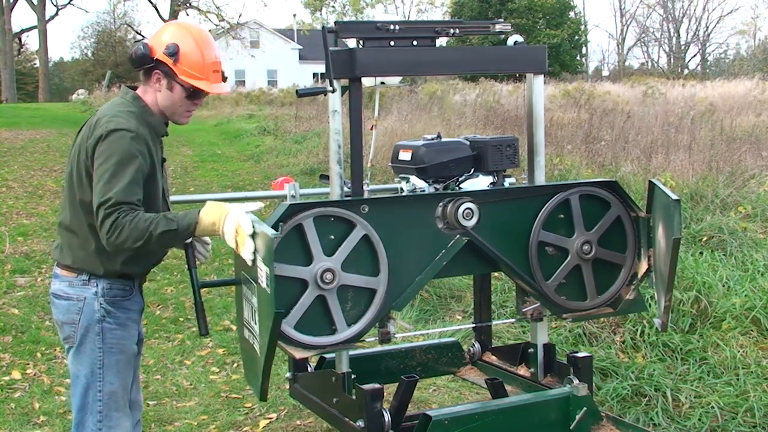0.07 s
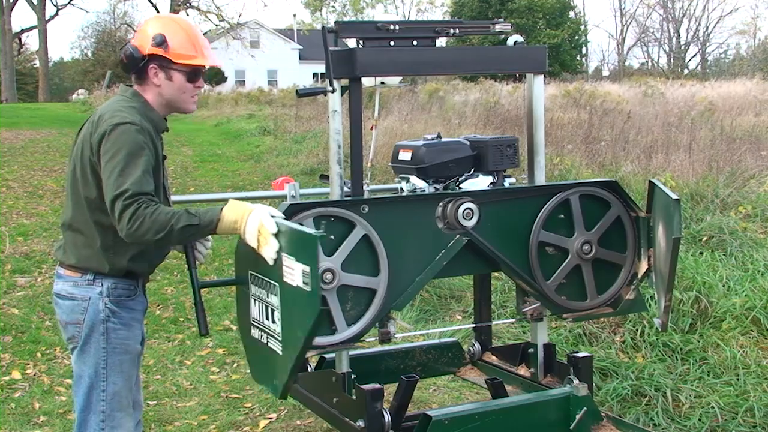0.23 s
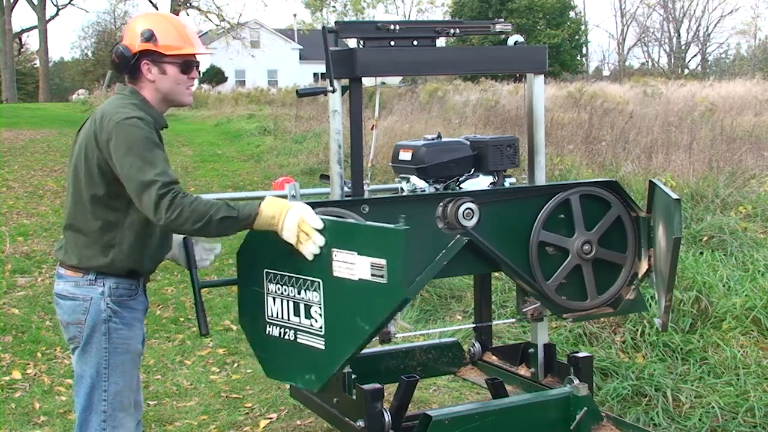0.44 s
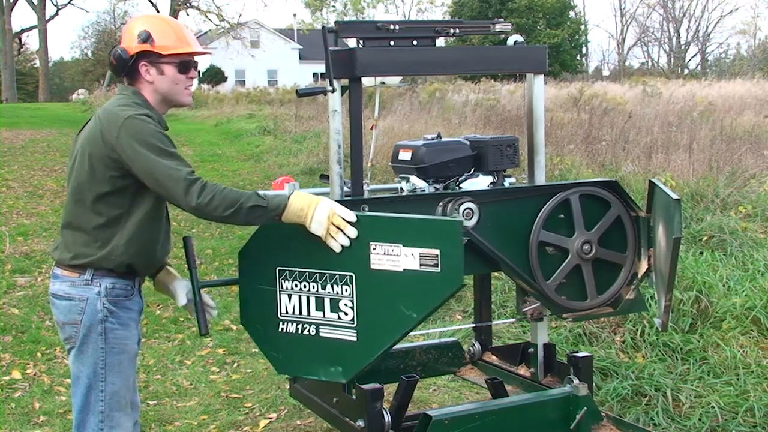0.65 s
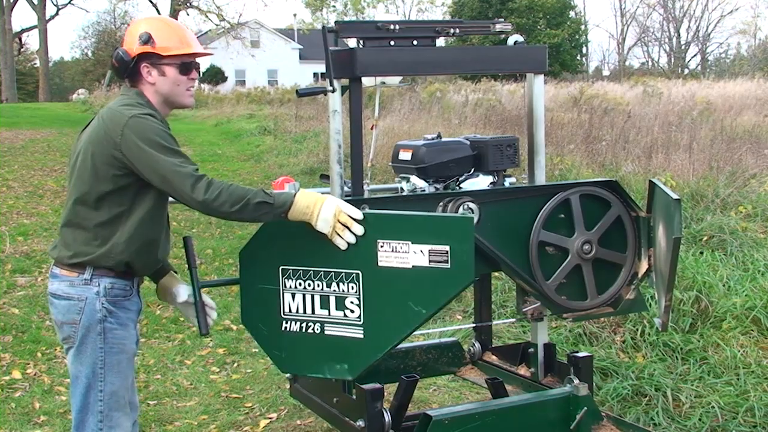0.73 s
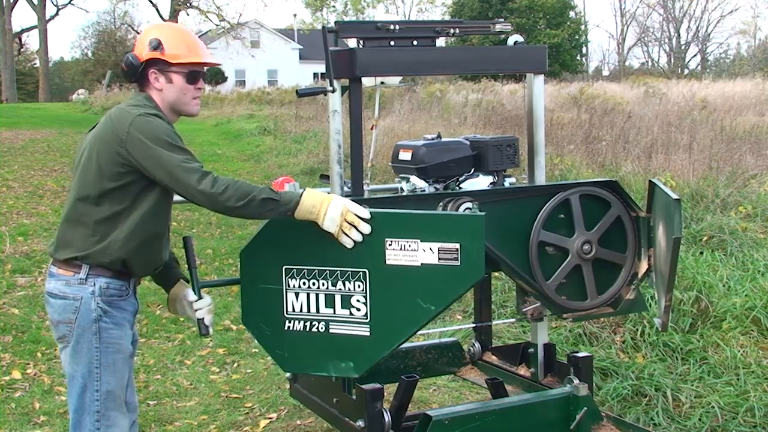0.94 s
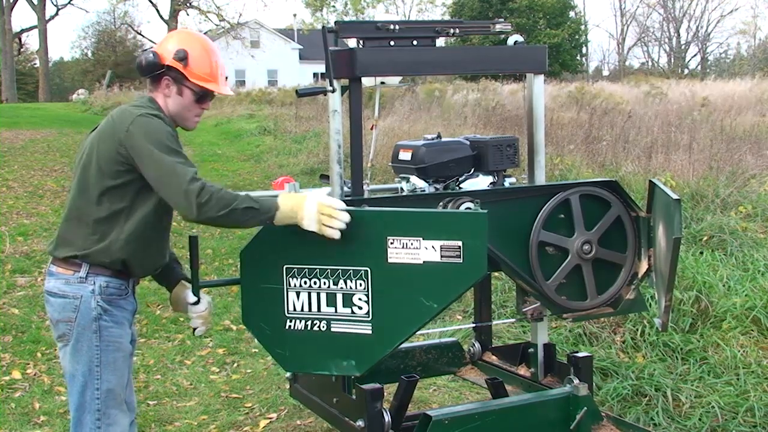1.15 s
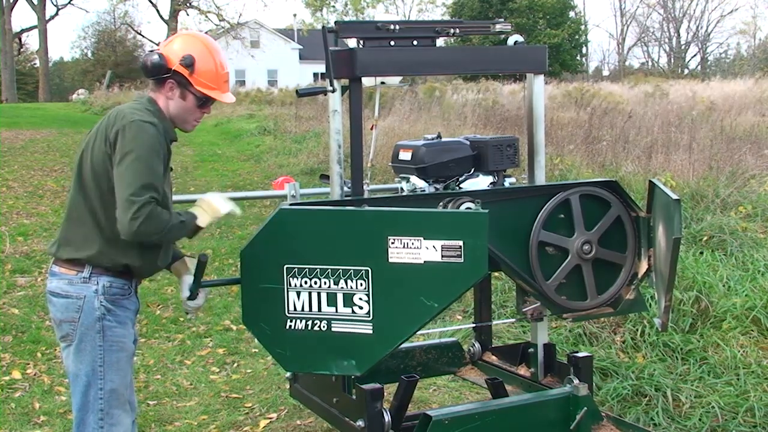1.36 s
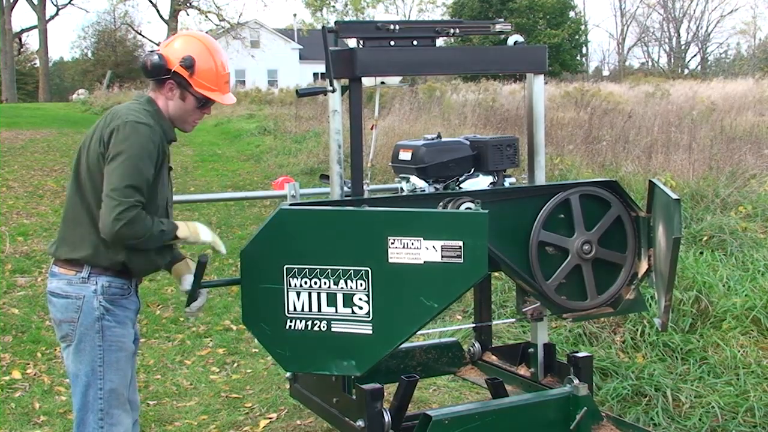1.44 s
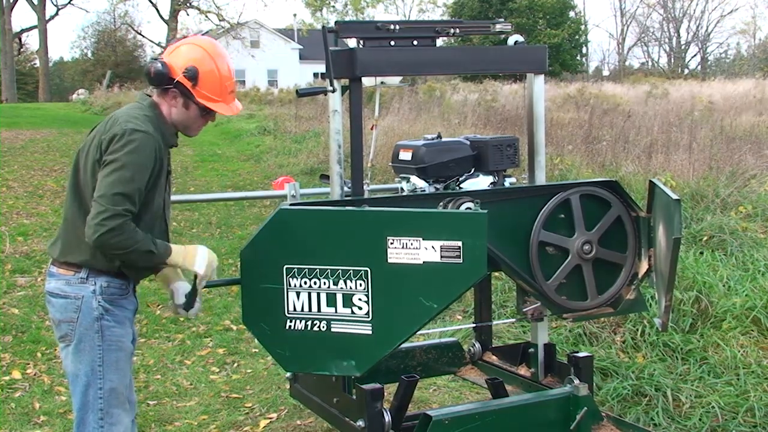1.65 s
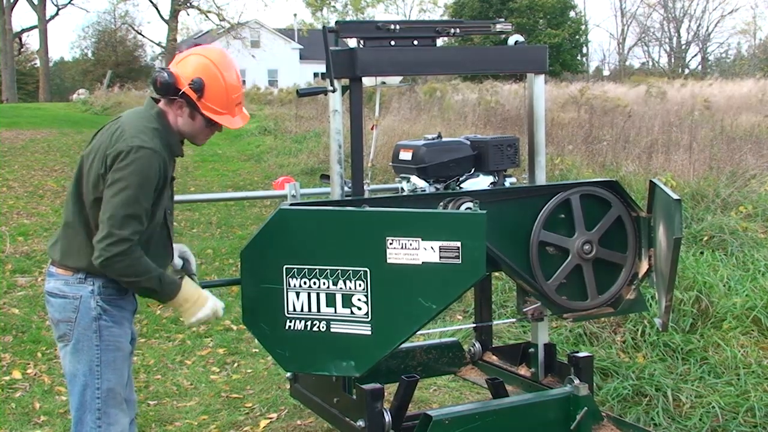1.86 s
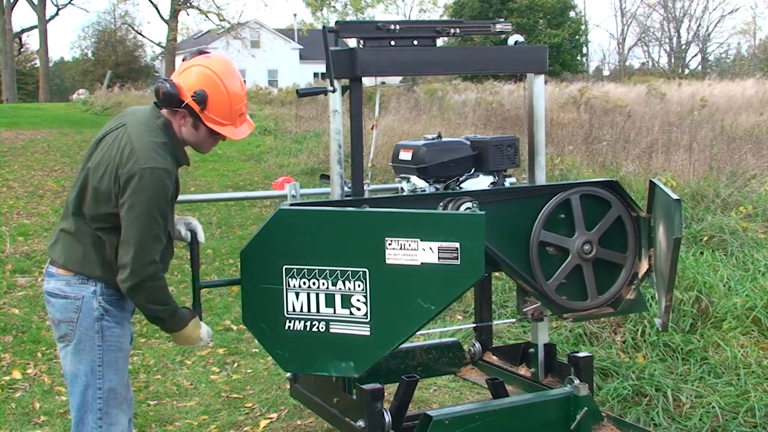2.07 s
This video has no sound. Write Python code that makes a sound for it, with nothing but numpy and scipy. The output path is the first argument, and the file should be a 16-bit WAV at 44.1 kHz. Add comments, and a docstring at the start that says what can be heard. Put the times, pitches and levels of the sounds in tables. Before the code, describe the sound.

A sheet-steel guard door swings shut on a sawmill with one bright clang and a brief ring. A glove slips off it with a short groan, then a sleeve rustles nearby and a handle ticks faintly, over quiet outdoor hiss.

```python
"""Low outdoor rumble and steady hiss, with faint rustle and handle ticks. A sheet-steel guard door is
swung shut on a sawmill: its edge clashes on the frame and the panel rings briefly in many modes.
A faint far whistle passes. A gloved hand sticks and slips off the door with a short groan,
then a sleeve rustles close by and the handle ticks again."""
import sys
import numpy as np
from scipy import signal
from scipy.fft import rfft, irfft
from scipy.io import wavfile

SR = 44100
rng = np.random.default_rng(int(sys.argv[2]) if len(sys.argv) > 2 else 0)


def pcm_store(signal):
    """Save signal as 16-bit PCM."""
    levels = np.round(np.clip(np.atleast_2d(signal), -1, 1) * 32767)
    wavfile.write(sys.argv[1], SR, levels.astype(np.int16).T)


N = 92610
T = np.arange(N) / SR
SLAM_S = 0.2296


def undb(db):
    """Decibels to gain."""
    return 10 ** (np.asarray(db) / 20)


def at_hz(hz, points):
    """Interpolate (f/Hz, value) points over log frequency."""
    f, value = np.array(points, float).T
    return np.interp(np.log(np.maximum(hz, 1)), np.log(f), value)


def shaped(gain):
    """Unit-rms noise with amplitude spectrum gain(f)."""
    f = np.arange(N // 2 + 1) * SR / N
    noise = irfft(rfft(rng.standard_normal(N)) * gain(f), N)
    return noise / noise.std()


def coloured(points):
    """Unit-rms noise from (f/Hz, relative density/dB) points."""
    return shaped(lambda f: undb(at_hz(f, points)))


def band(hz, width_hz):
    """Unit-rms noise in one resonance; width at -6 dB."""
    return shaped(lambda f: 1 / (1 + ((f * f - hz * hz) / (np.maximum(f, 1) * width_hz)) ** 2))


def walk(corner_hz):
    """Smooth random drift, mean 0, spread 1."""
    drift = shaped(lambda f: 1 / (1 + (f / corner_hz) ** 2) ** 2)
    return drift - drift.mean()


def decay(start_s, t60_s, rise_s=0.00017):
    """Quick rise, exponential fall."""
    age = np.maximum(T - start_s, 0)
    return (1 - np.exp(-age / rise_s)) * np.exp(-np.log(1000) * age / t60_s)


def swell(middle_s, half_s):
    """Gaussian envelope; half-width at 1/e."""
    return np.exp(-((T - middle_s) / half_s) ** 2)


def ring(start_s, modes):
    """Damped sines (f/Hz, level/dB, t60/s) struck together, signs random."""
    out, first = np.zeros(N), int(start_s * SR)
    for (hz, db, t60), sign in zip(modes, rng.choice([-1, 1], len(modes))):
        age = T[:min(N - first, int(t60 * SR))]
        envelope = undb(db) * np.exp(-np.log(1000) * age / t60)
        out[first:first + len(age)] += sign * envelope * np.sin(2 * np.pi * hz * age)
    return out


def air(mid_db=-53.5, side_db=-72, rumble_below_hz=85, waver_db=2):
    """Steady hiss over a wavering rumble, almost the same left and right."""
    # background common to both sides: f/Hz, relative density/dB
    mid_spectrum = [(15, -74), (25, -12.5), (65, -0.5), (169, -11.5), (197, -16), (269, -14), (377, -21.5),
                    (718, -15), (1090, -18), (1520, -20.5), (1640, -20), (1770, -25), (4610, -31.5),
                    (11100, -31.5), (12000, -35), (15600, -66), (22000, -120)]
    # background in antiphase: f/Hz, relative density/dB
    side_spectrum = [(25, 7.5), (70, -5.5), (250, -15), (1000, -35), (3000, -38.5), (6000, -18.5),
                     (10000, -19), (12000, -18), (13000, -60)]
    mid = coloured(mid_spectrum)
    rumble = signal.sosfiltfilt(signal.butter(2, rumble_below_hz, fs=SR, output="sos"), mid)
    mid = mid - rumble + rumble * undb(waver_db * walk(3.3))
    side = coloured(side_spectrum) * np.array([[1], [-1]])
    return undb(mid_db) * mid + undb(side_db) * side


def clothes(grain_db=1.2, grain_hz=250):
    """Grainy rub of a sleeve, dull shuffles of cloth and feet, soft body bumps."""
    # sleeve rub: t/s, level/dB
    sleeve_level = [(0, -58.5), (.09, -59.5), (.2, -61), (.7, -70), (1.25, -63.5), (1.39, -54.5),
                    (1.44, -46), (1.48, -51.5), (1.51, -47), (1.575, -57.5), (1.62, -52.5), (1.69, -68),
                    (1.88, -58.5), (2.0, -63), (2.1, -57)]
    # sleeve colour: f/Hz, relative density/dB
    sleeve_spectrum = [(200, -3.5), (500, -2), (900, -13), (1400, -2.5), (1900, -10.5), (2700, -12),
                       (4200, -13), (6000, -20), (9000, -15.5), (12000, -20.5)]
    # shuffles: middle t/s, half-width/s, level/dB, f/Hz, width/Hz
    shuffles = [(0.103, 0.079, -52.5, 666, 1150), (0.438, 0.024, -54, 1270, 1420),
                (0.555, 0.13, -56.5, 950, 950), (0.614, 0.12, -59, 270, 137), (1.29, 0.15, -60, 400, 514),
                (1.84, 0.028, -56.5, 1470, 790), (1.913, 0.035, -55, 1620, 450)]
    # body bumps: t/s, level/dB, f/Hz, t60/s
    bumps = [(.552, -46.5, 324, 0.11), (0.781, -46.5, 85, 0.079), (1.164, -46, 78, 0.25),
             (1.445, -45, 98.3, 0.35), (1.497, -36, 66, 0.11), (1.584, -44.5, 126, 0.18),
             (1.776, -47, 93, 0.17), (1.952, -44, 63, .08)]
    rub_db = np.interp(T, *np.array(sleeve_level).T) + grain_db * walk(grain_hz)
    sleeve = undb(rub_db) * coloured(sleeve_spectrum)
    shuffling = sum(undb(db) * swell(t, half) * band(hz, width) for t, half, db, hz, width in shuffles)
    bumping = sum(ring(t, [(hz, db, t60)]) for t, db, hz, t60 in bumps)
    return sleeve + shuffling + bumping


def fitting_ticks():
    """Light, dead clicks of hinge and handle."""
    # clicks: t/s, level/dB, f/Hz, width/Hz, t60/s
    ticks = [(0.0689, -41.5, 1870, 1500, 0.012), (0.075, -46, 1950, 1500, 0.028),
             (1.55, -50.5, 2730, 900, 0.051), (1.612, -45.5, 1830, 1600, 0.018),
             (1.666, -46.5, 1560, 700, .045)]
    return sum(undb(db) * decay(t, t60) * band(hz, width) for t, db, hz, width, t60 in ticks)


def door_clash(sizzle_db=-26, thud_hz=302, thud_db=-22, thud_t60_s=0.013):
    """The edge chatters on the frame over a short thud; the highest modes sizzle out quickly."""
    # edge-on-frame contacts: t/s, level/dB
    contacts = [(0.229, -18), (0.231, -19), (0.2363, -22.5), (.2485, -34)]
    # contact colour: f/Hz, relative density/dB
    spectrum = [(35, -51), (60, -15), (316, -15.5), (441, -29), (719, -7), (1020, -25), (1370, -13),
                (1740, -16), (2180, -5), (2330, -10), (2970, -11.5), (4230, -12.5), (5400, -25),
                (7210, -15), (12000, -52), (15600, -63), (22000, -120)]
    power = sum((undb(db) * decay(t, t60_s=0.041, rise_s=0.00047)) ** 2 for t, db in contacts)
    chatter = np.sqrt(power) * coloured(spectrum)
    sizzle = undb(sizzle_db) * decay(SLAM_S, t60_s=0.1) * band(7250, width_hz=3300)
    thud = ring(SLAM_S, [(thud_hz, thud_db, thud_t60_s)])
    return chatter + sizzle + thud


def door_panel(count=400, spacing_hz=13, scatter_db=3.2, weak_rms_db=-29.5):
    """Strong modes stand above evenly crowded weak ones, as in any thin plate."""
    # strong panel modes: f/Hz, level/dB, t60/s
    strong_modes = [(172, -44, .35), (260.5, -40, .52), (328, -40, .55), (679, -40, .6), (782, -37, .4),
                    (834.5, -44, .8), (985, -39, .38), (1124, -36, .2), (1276, -35, .28), (1358, -34, .26),
                    (1382, -36, .2), (1414, -38, .33), (1467, -40, .33), (1501, -41, .4),
                    (1875, -35.5, .33), (1928, -34.5, .33), (2033, -45, .55), (2088, -42, .42),
                    (2118, -34, .18), (2310, -29, .22), (2359, -34, .18), (2560, -35, .18),
                    (2599, -33, .25), (2662, -46, .65), (2798, -31, .3), (3105, -34, .26), (3239, -32, .18),
                    (3312, -40, .34), (3433, -33, .2), (3660, -40, .22), (3860, -37, .27), (4125, -37, .2),
                    (6363, -33, .085), (7280, -32, .085), (8520, -36, .09)]
    # weak-mode colour: f/Hz, relative level/dB
    weak_spectrum = [(120, -20), (250, -6.5), (400, -4), (580, -6), (760, -2), (1050, -1), (1400, -4.5),
                     (1750, -3.5), (2400, -6), (3400, -3.5), (4500, -5.5), (5100, -7.5), (5600, -26)]
    # weak-mode ring time: f/Hz, t60/s
    weak_t60 = [(200, 0.56), (900, 0.52), (2000, .44), (3500, 0.43), (5200, 0.27)]
    hz = spacing_hz * (np.arange(count) + 10 + rng.random(count))
    db = at_hz(hz, weak_spectrum) + scatter_db * rng.standard_normal(count)
    db += weak_rms_db - 10 * np.log10(np.sum(undb(db) ** 2) / 2)  # total rms at onset
    weak_modes = np.c_[hz, db, at_hz(hz, weak_t60)]
    return ring(SLAM_S, weak_modes) + ring(SLAM_S, strong_modes)


def whistle(hz=1652, level_db=-59.5, waver=0.0044):
    """One thin, slightly unsteady tone far away."""
    cycles = np.cumsum(hz * (1 + waver * walk(39))) / SR
    return undb(level_db) * swell(middle_s=0.756, half_s=0.115) * np.sin(2 * np.pi * cycles)


def glove_groan(scuff_db=-41, waver=0.012):
    """The glove sticks and slips on the door; each slip scuffs and drives a few hand-damped modes."""
    # slips: t/s, relative level/dB
    slips = [(1.3405, -7), (1.3475, 0), (1.3515, -3), (1.3615, -8), (1.367, -9), (1.378, -9)]
    # damped door modes: f/Hz, level/dB for a 0 dB slip, t60/s
    modes = [(262, -47, 0.087), (466, -31, .1), (685, -37, .065), (1250, -45, 0.037)]

    def envelope(t60_s):
        return np.sqrt(sum((undb(db) * decay(t, t60_s, rise_s=0.0015)) ** 2 for t, db in slips))

    def tone(hz):
        cycles = np.cumsum(hz * (1 + waver * walk(112))) / SR
        return np.sin(2 * np.pi * cycles)

    scuff = undb(scuff_db) * envelope(t60_s=0.049) * band(780, width_hz=730)
    return scuff + sum(undb(db) * envelope(t60) * tone(hz) for hz, db, t60 in modes)


def scene():
    """Centred sources over the stereo background."""
    return air() + clothes() + fitting_ticks() + door_clash() + door_panel() + whistle() + glove_groan()


def record(dry):
    """Steep low-pass on the top treble."""
    cutoff_hz = 11850
    return signal.sosfilt(signal.ellip(10, 0.2, 70, cutoff_hz, fs=SR, output="sos"), dry)


dry = scene()
out = record(dry)
pcm_store(out)
```